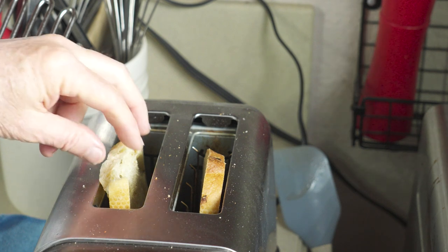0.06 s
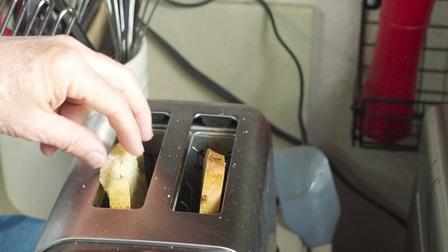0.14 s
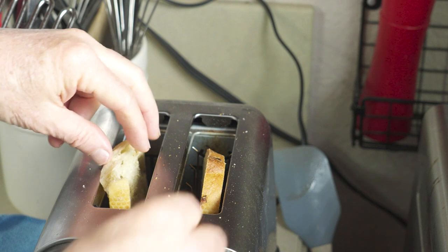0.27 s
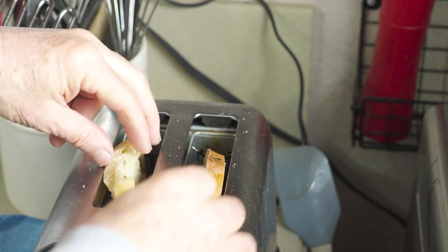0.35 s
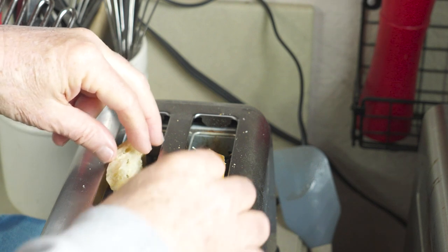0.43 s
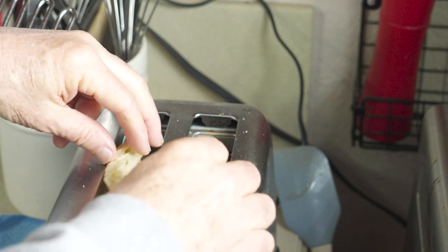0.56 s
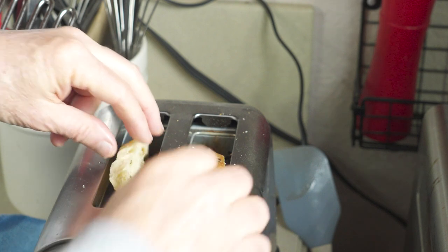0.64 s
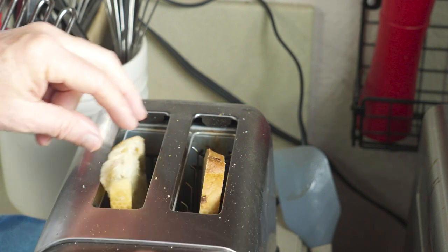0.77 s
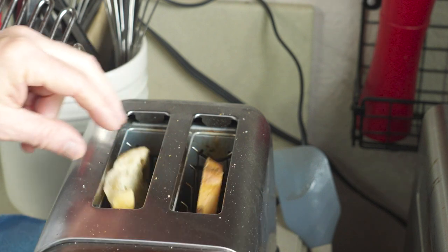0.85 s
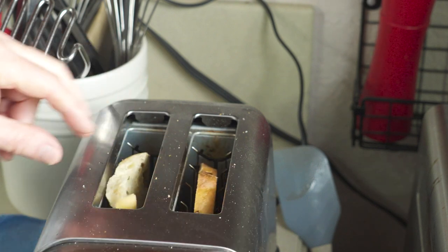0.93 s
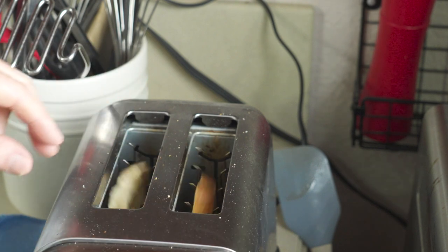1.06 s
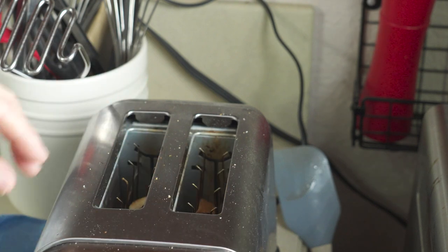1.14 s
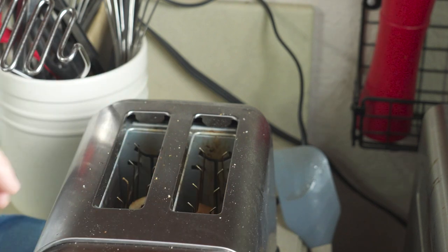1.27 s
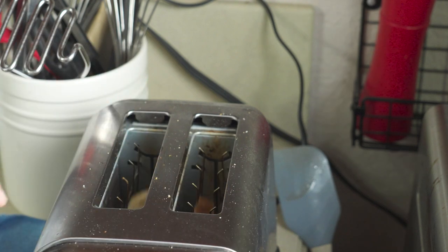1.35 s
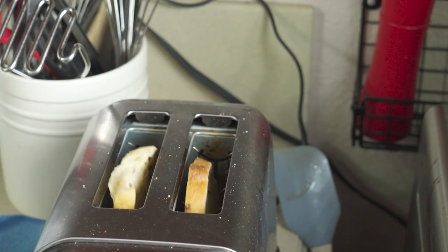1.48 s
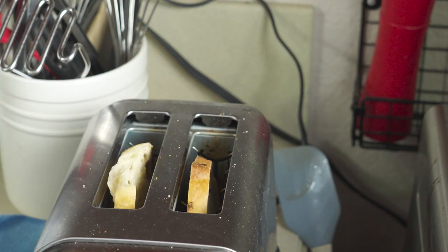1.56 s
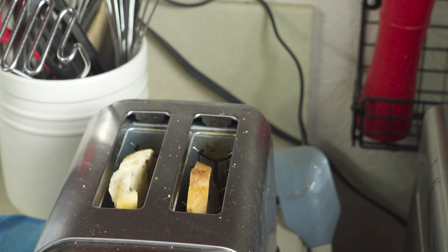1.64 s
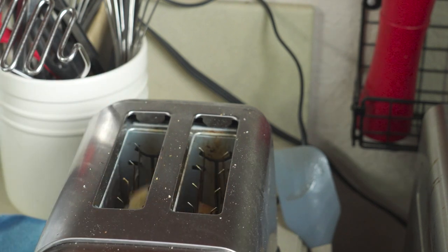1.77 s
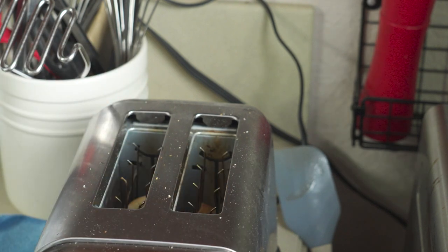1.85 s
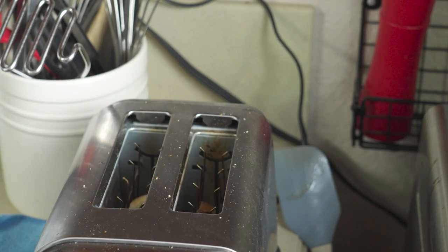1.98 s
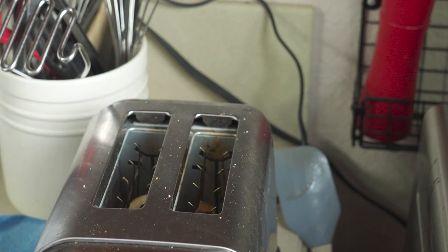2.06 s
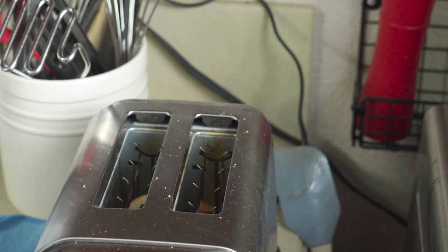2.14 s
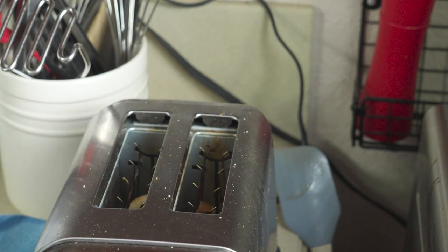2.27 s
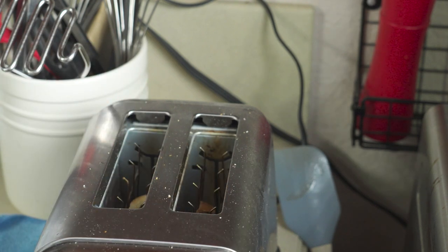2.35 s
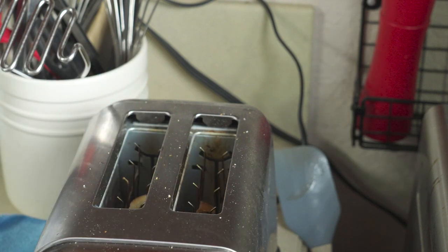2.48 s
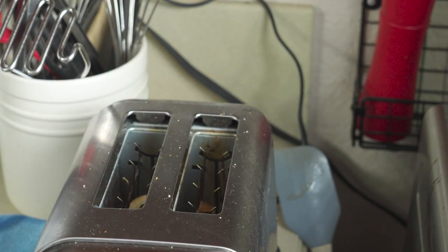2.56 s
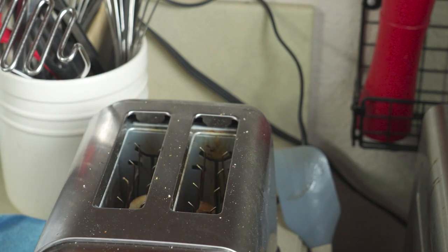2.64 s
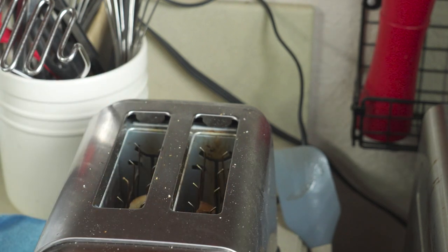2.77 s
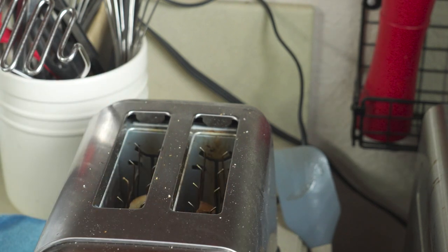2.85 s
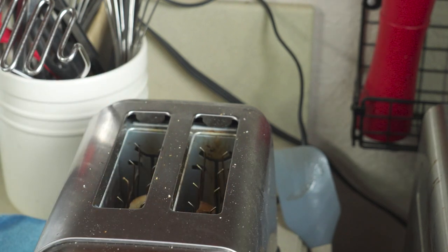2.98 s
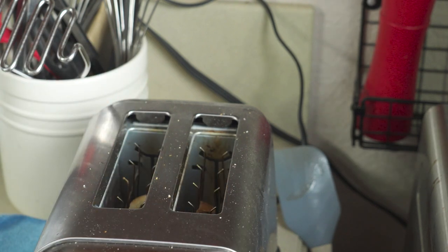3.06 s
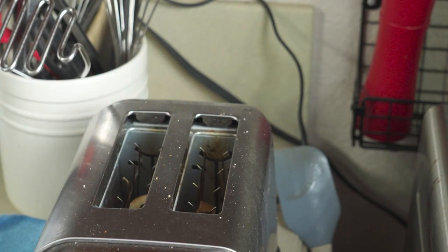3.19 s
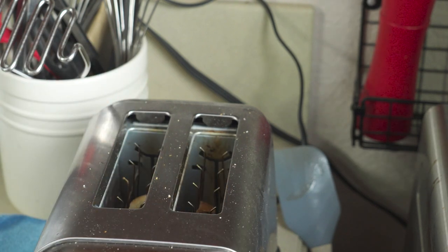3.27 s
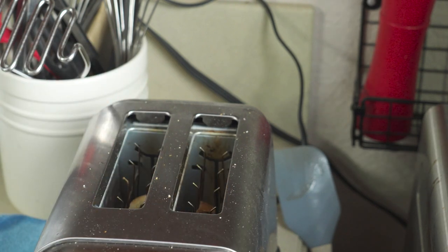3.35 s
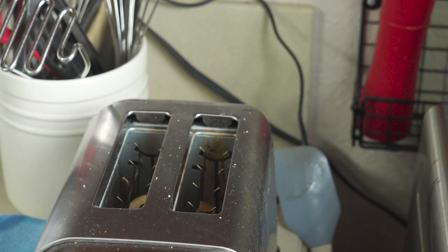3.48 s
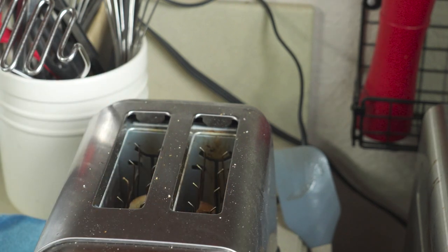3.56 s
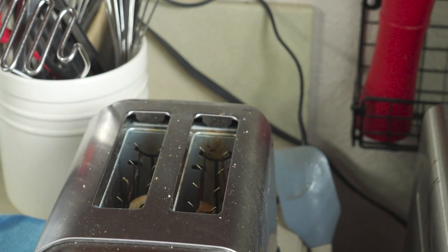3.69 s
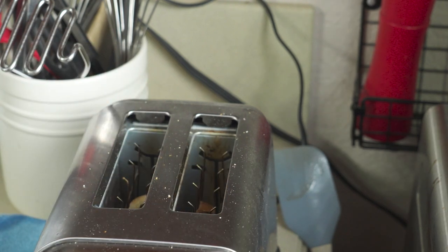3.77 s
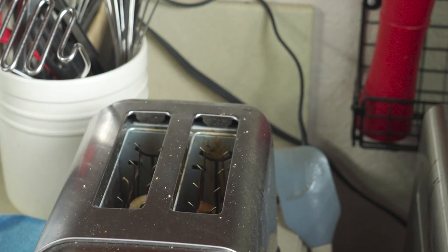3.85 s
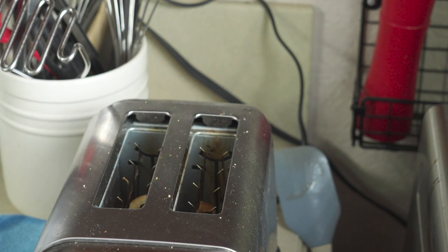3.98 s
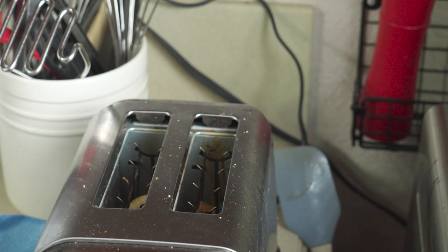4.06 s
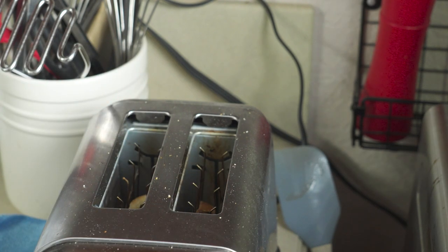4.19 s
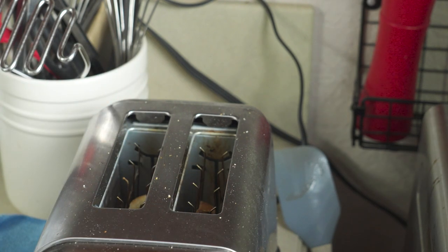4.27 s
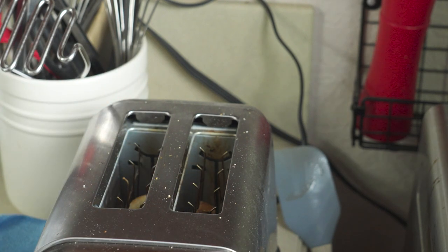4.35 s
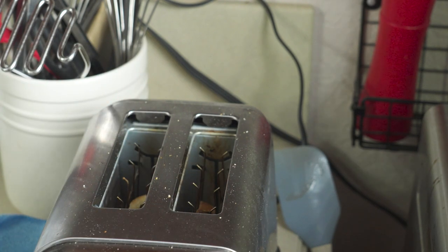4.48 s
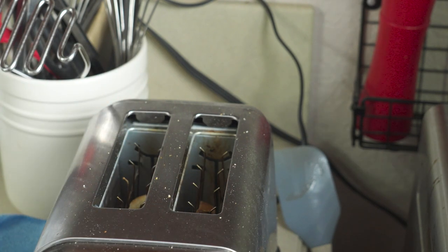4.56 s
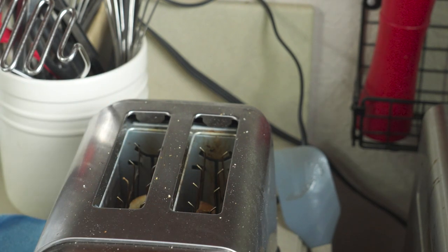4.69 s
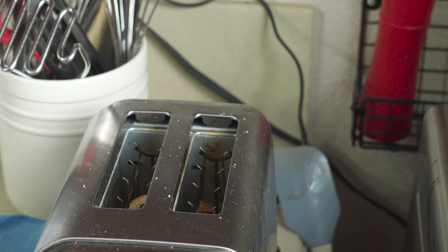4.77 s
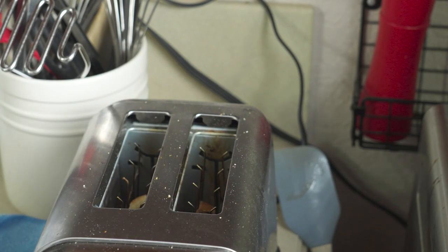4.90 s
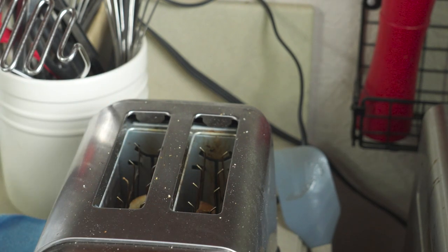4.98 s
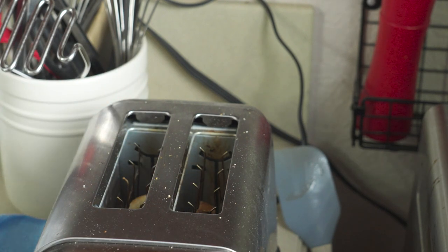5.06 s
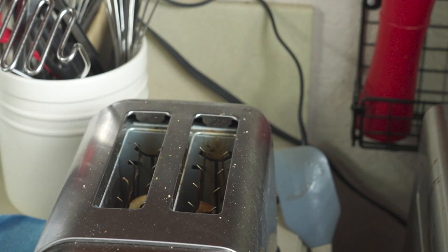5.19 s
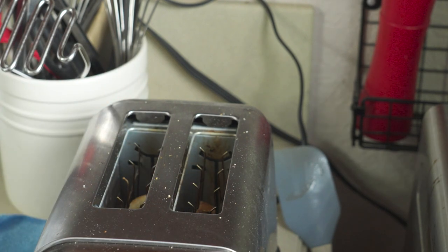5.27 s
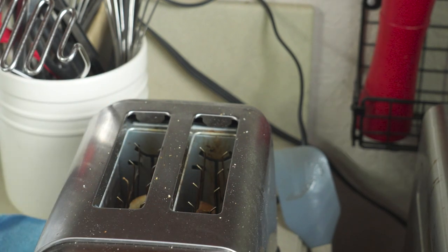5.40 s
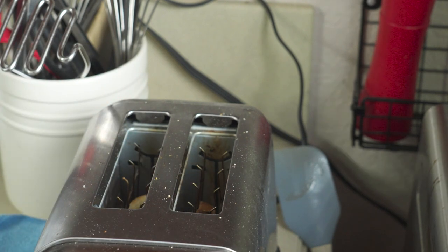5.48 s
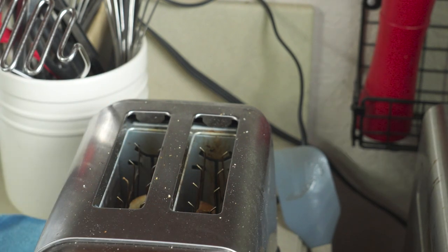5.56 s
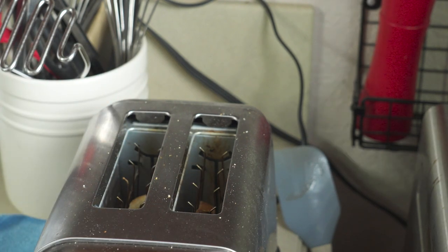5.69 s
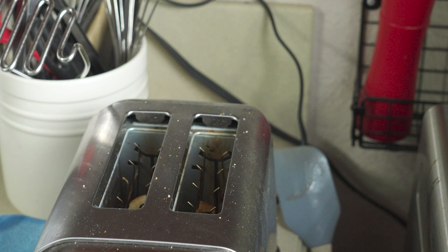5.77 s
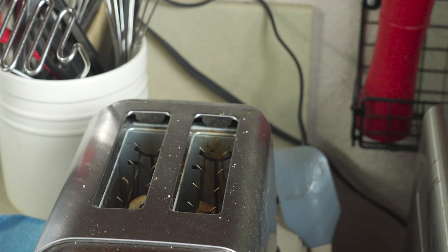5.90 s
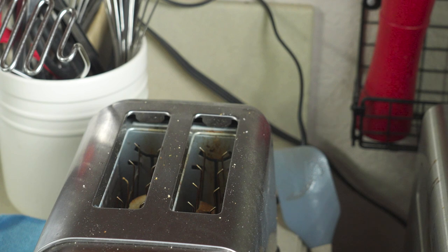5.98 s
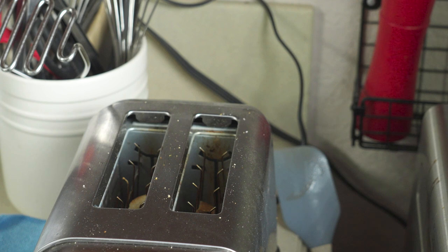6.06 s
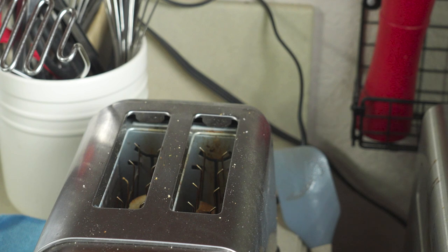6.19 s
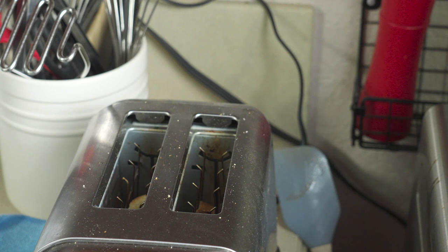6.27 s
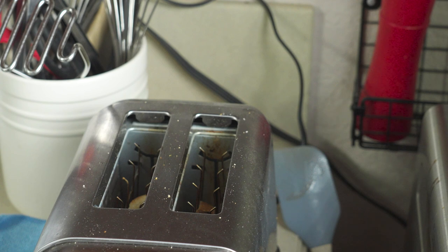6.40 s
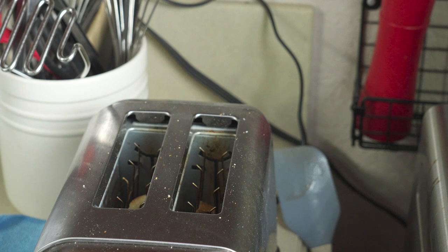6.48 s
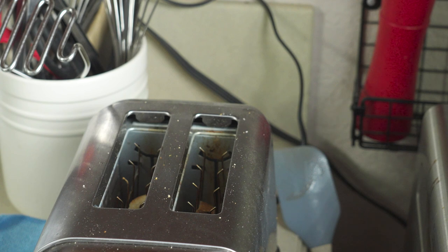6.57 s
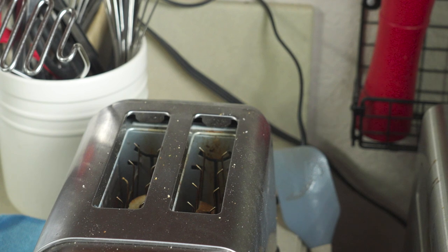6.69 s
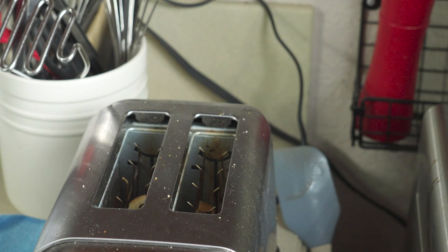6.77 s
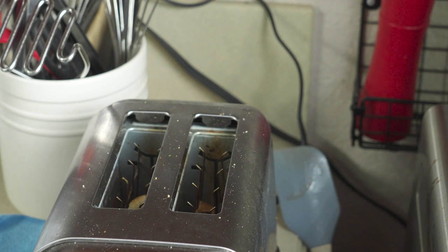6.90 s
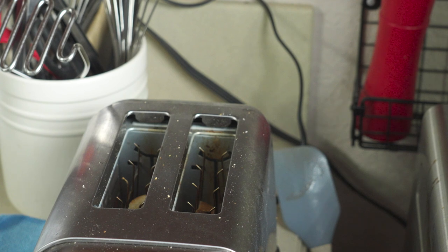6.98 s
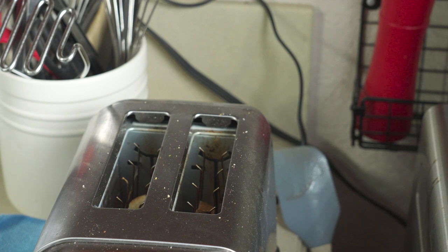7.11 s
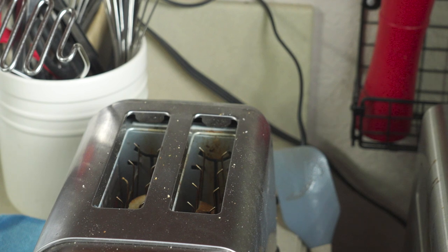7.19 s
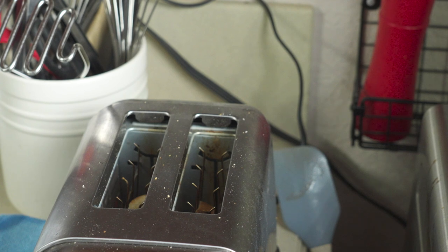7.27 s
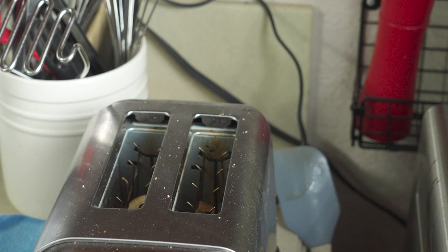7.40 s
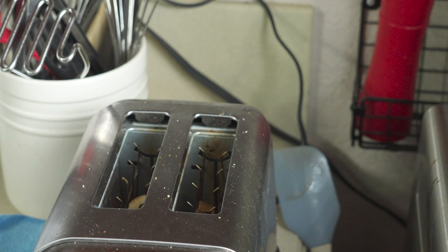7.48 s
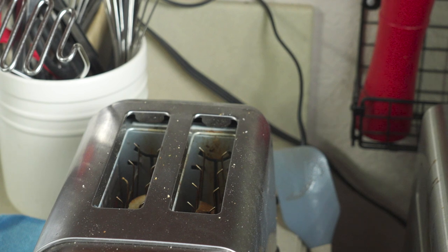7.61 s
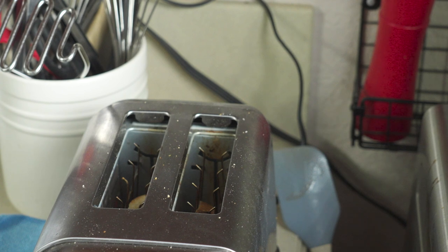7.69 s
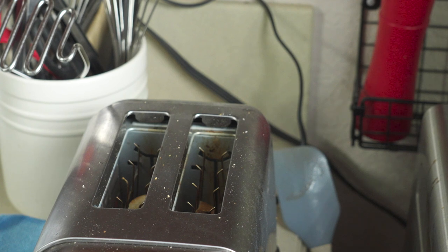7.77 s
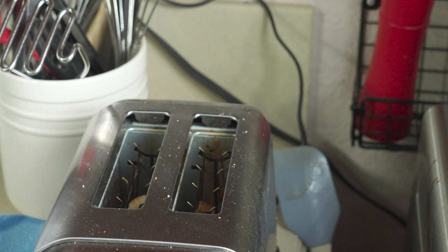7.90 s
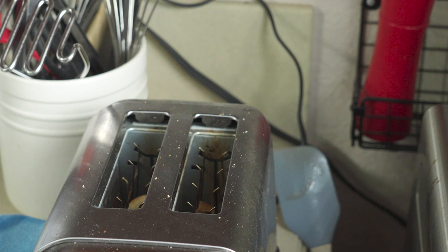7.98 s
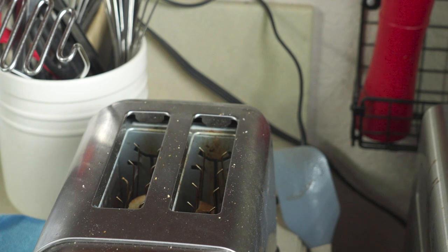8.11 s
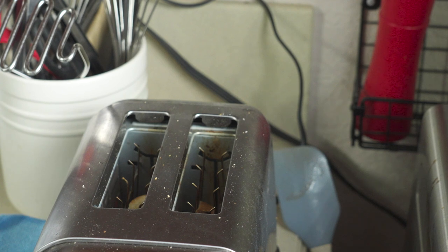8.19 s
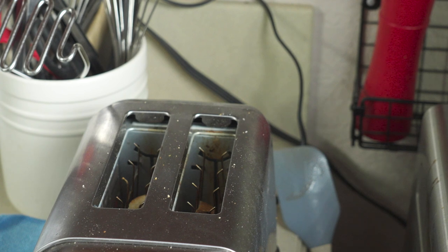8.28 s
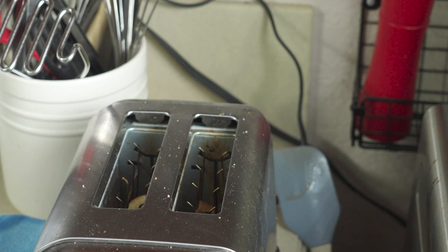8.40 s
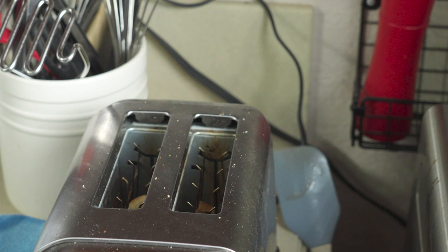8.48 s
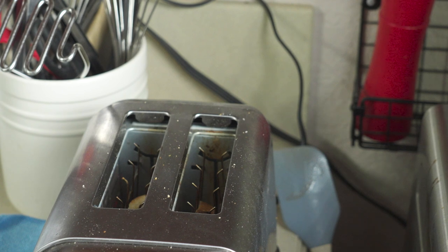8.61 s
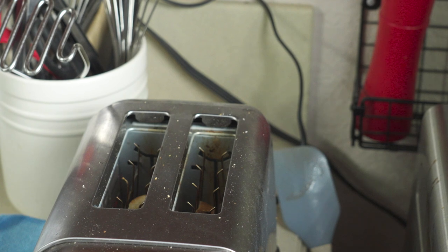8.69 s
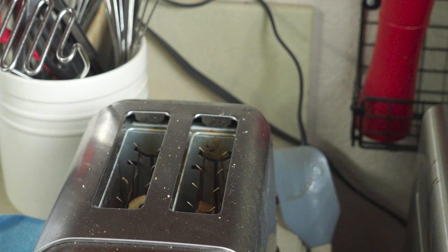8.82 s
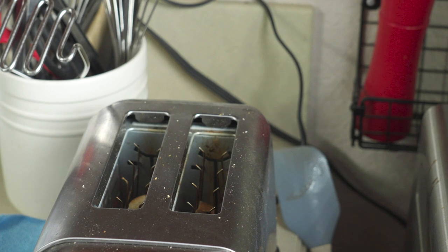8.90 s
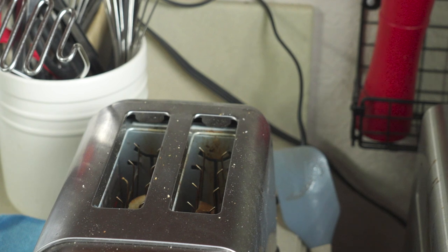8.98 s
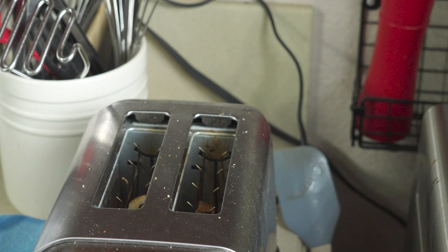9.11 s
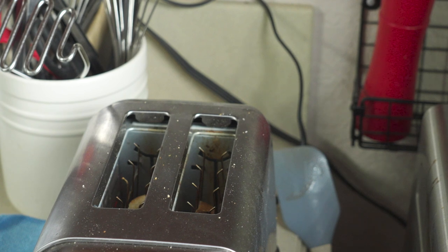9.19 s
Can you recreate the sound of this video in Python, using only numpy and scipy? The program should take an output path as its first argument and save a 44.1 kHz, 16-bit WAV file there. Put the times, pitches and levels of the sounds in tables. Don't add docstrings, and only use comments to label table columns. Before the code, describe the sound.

Close microphone by a metal toaster: faint bumps and scraping, a loud sharp clack with rattling, then a second, louder clunk as the carriage catches. A very faint low hum lingers under soft hiss. Someone moves about, with dull steps, a cluster of crockery knocks and small ticks midway, soft handling later, then a latch click and a bouncing, hollow door slam. Short room echo.

```python
import sys
import numpy as np
from scipy import signal
from scipy.fft import rfft, irfft
from scipy.io import wavfile
from scipy.ndimage import uniform_filter1d

SR = 44100
rng = np.random.default_rng(int(sys.argv[2]) if len(sys.argv) > 2 else 0)


def voltage_ratio(level):
    return 10 ** (np.asarray(level, float) / 20)


def dump_mix(stems):
    frames = np.atleast_2d(stems).T
    limited = np.clip(frames, -1, 1)
    pcm = np.round(limited * 32767).astype(np.int16)
    wavfile.write(sys.argv[1], SR, pcm)


N = 407925

# time in seconds, level in dB.
AIR_LEVEL = [(0.0, -59.5), (9.25, -61.5)]
# pitch in Hz, strength in dB per Hz.
HISS_COLOUR = [(24, -62), (40, -18), (80, -10), (287, -8), (509, -1.5), (562, -6), (778, -2.5),
               (1250, -5.5), (1380, -2.5), (2390, -5), (5440, -4), (7710, -8.5), (10700, -13.5),
               (15500, -12.5)]
# time in seconds, level in dB.
HUM_LEVEL = [
    (2.15, -69),
    (2.232, -79),
    (2.826, -78.5),
    (3.038, -83.5),
    (3.22, -79),
    (3.592, -85),
    (4.2, -85.5),
    (5.25, -89.5),
    (6.55, -85),
]
# pitch in Hz, level in dB, ring length in seconds before it is
# scaled down and capped at 45 ms.
SHELL_RINGS = [(221, 2.5, 0.51), (404, -8, 0.54), (573, -4, 0.84), (825, -18, 0.22), (1404, 1.5, 0.83),
               (1776, 8, 0.33), (1910, 4, 0.074), (2830, 12.5, 0.06), (3500, -24, 0.24), (3460, -19, 0.9),
               (3800, -10, 0.37), (4100, -22, 0.13), (5685, -4, 0.35), (6245, -18, 0.28), (7230, -34, 0.28),
               (6760, -21, 0.19)]
# pitch in Hz, strength in dB per Hz.
SHELL_COLOUR = [(35, -19), (60, -5), (187, -14), (226, -10), (272, -23), (403, -4.5), (464, 1), (585, -2),
                (1020, -8), (1290, -7.5), (2150, -10), (3050, -12), (7370, -22.5), (15500, -32.5)]
# start in seconds, peak level in dB,
# rattle time to fall 60 dB in seconds, favoured pitch in Hz.
SLIDES = [(0.84, -44.5, 0.22, 300), (0.899, -39, 0.17, 509), (1.079, -45.5, 0.13, 606),
          (1.149, -15.5, 0.17, 2420), (1.156, -14.5, 0.18, 547), (1.415, -33.5, 0.16, 859),
          (1.439, -34, 0.81, 506), (1.499, -31.5, 0.12, 1730), (1.571, -38.5, 0.12, 3840),
          (1.69, -41, 0.2, 3500), (1.775, -26, 0.11, 482), (1.783, -12, 0.27, 573),
          (2.007, -30, 0.052, 476), (2.04, -39, 0.18, 490), (2.079, -39, 0.18, 501)]
# start in seconds, peak level in dB, rattle time to fall 60 dB in seconds,
# treble tilt in dB per octave, favoured pitch in Hz.
CLICKS = [
    (0.88, -41.5, 0.074, 3, 886),
    (1.479, -25.5, 0.1, 2.5, 4050),
    (2.006, -36, 0.046, 0, 1400),
    (2.205, -41.5, 0.03, 3, 5430),
]
# start in seconds, peak level in dB, gap to the first bounce in seconds,
# loss in dB per bounce, favoured pitch in Hz.
SLAMS = [
    (1.175, -7, 0.004, 2.5, 1465),
    (1.801, -4.5, 0.0065, 4, 2430),
]
# start in seconds, peak level in dB, floor pitch in Hz,
# sole snap level in dB.
FOOTFALLS = [(0.869, -43, 99.6, 8.5), (1.077, -51, 99.6, -4), (1.178, -26.5, 74.5, 7), (1.599, -47, 85, 3),
             (1.8, -32, 104, 10), (1.83, -31, 73, 18), (2.6, -54.5, 60, -12), (2.751, -53.5, 65, -13.5),
             (3.178, -51.5, 73, -13), (3.718, -42.5, 78, -13), (3.754, -49.5, 87, -3.5),
             (5.42, -53, 73, -12), (5.475, -51, 79, -20), (5.55, -43, 80.6, -13.5), (5.622, -53, 77, -12),
             (5.848, -54, 57, -20), (6.57, -39, 70.4, -7), (6.269, -57, 119, 7), (6.678, -54, 75.4, -12),
             (6.767, -51.5, 83.5, -3), (7.228, -42, 100, 0.5), (7.295, -43, 67.6, 3),
             (7.501, -44.5, 89, 0.5), (7.77, -59, 69.6, -15), (7.871, -41, 64.6, 3), (8.473, -34, 86.1, -1),
             (8.599, -30, 104, 3.5), (8.987, -45, 99, -7), (9.068, -46, 78.1, 2), (9.201, -38, 94.2, 4)]
# start in seconds, peak level in dB, upper ring in Hz.
KNOCKS = [
    (2.01, -31.5, 1180),
    (4.162, -38, 1130),
    (4.264, -28.5, 1090),
    (4.279, -36.5, 775),
    (7.485, -44.5, 730),
    (8.999, -48, 1110),
    (9.099, -47, 800),
    (9.159, -41.5, 1110),
    (9.2, -41.5, 1040),
    (9.234, -42, 774),
]
# start in seconds, peak level in dB, low ring in Hz,
# high ring in Hz, rattle time to fall 60 dB in seconds.
DRAGS = [(2.8, -50, 1500, 1530, 0.2), (2.92, -50, 1330, 1400, 0.29), (2.998, -47.5, 1250, 1330, 0.19),
         (4.171, -40, 487, 2460, 0.19), (4.445, -39, 1190, 1500, 0.63), (4.61, -37.5, 1340, 1590, 0.3),
         (4.679, -38.5, 1150, 1600, 0.058), (4.799, -42, 1250, 1450, 0.24), (7.51, -47, 393, 1600, 0.67),
         (7.599, -47, 513, 1670, 0.12), (9.139, -53, 1130, 2000, 0.33)]
# time of a loudest moment in seconds, level in dB.
RUSTLE = [
    (2.818, -61),
    (3.024, -58.5),
    (3.124, -66),
]
# start in seconds, peak level in dB,
# centre pitch in Hz, rattle time to fall 60 dB in seconds.
SCUFFS = [(3.415, -47, 1460, 0.14), (4.15, -36.5, 2150, 0.12), (4.242, -39.5, 1070, 0.087),
          (4.51, -36, 1500, 0.12), (4.55, -51, 1340, 0.15), (5.405, -42, 800, 0.072),
          (5.849, -46.5, 1400, 0.33), (6.257, -43, 1110, 0.19), (7.241, -41, 1350, 0.3),
          (7.52, -45, 2580, 0.52), (9.077, -48, 666, 0.35), (9.218, -50, 790, 0.18)]
# start in seconds, peak level in dB, low ring in Hz, high ring in Hz,
# rattle time to fall 60 dB in seconds.
TICKS = [
    (3.555, -44, 1700, 3000, 0.018),
    (3.6898, -50, 1400, 5310, 0.024),
    (4.4876, -40, 1530, 2450, 0.066),
    (4.5111, -39.5, 2000, 3130, 0.11),
    (4.6082, -44, 1500, 3610, 0.035),
    (4.6658, -44, 2160, 3000, 0.034),
    (4.776, -48, 2080, 5600, 0.036),
    (7.2417, -44.5, 1530, 5500, 0.033),
]
# start in seconds, peak level in dB, ring in Hz,
# rattle time to fall 60 dB in seconds.
CHIRPS = [
    (4.6656, -31.5, 1970, 0.017),
    (4.805, -49, 1490, 0.1),
    (7.2302, -37.5, 1563, 0.15),
    (7.869, -41, 1350, 0.12),
    (9.14, -50, 1110, 0.17),
    (9.185, -48, 1080, 0.15),
    (4.165, -47, 490, 0.2),
]
# start in seconds, peak level in dB, low ring in Hz, high ring in Hz,
# rattle time to fall 60 dB in seconds.
TAPS = [
    (4.262, -28, 540, 2440, 0.035),
    (4.288, -44, 520, 1500, 0.06),
    (4.509, -41, 1170, 1180, 0.096),
    (7.229, -49, 495, 1580, 0.033),
    (7.298, -46, 430, 1600, 0.039),
    (7.331, -58, 405, 1610, 0.073),
    (7.503, -51, 384, 1710, 0.093),
]
# start in seconds, peak level in dB, gap to the first bounce
# in seconds, loss in dB per bounce, favoured pitch in Hz.
LATCH = [
    (7.869, -35.5, 0.014, 2, 520),
    (7.963, -29.5, 0.0099, 2.2, 880),
]
JUDDER = [
    (8.362, -40, 0.026, 1, 404),
]
DOOR_HITS = [
    (8.462, -16, 0.0075, -1.1, 11000),
    (8.493, -19, 0.01, 4, 1280),
    (8.555, -31, 0.016, 9, 900),
    (8.599, -23.5, 0.008, 1, 9200),
    (8.68, -28.5, 0.012, 0.85, 9200),
    (8.767, -41, 0.035, 3.5, 800),
]
# pitch in Hz, level in dB, ring length in seconds before it is scaled down
# and capped at 45 ms.
PANEL_RINGS = [(316, 6, 0.077), (476, -16, 5.0), (616, -31, 5.0), (940, 9, 0.23), (1220, -32, 0.7),
               (1340, 6.5, 0.19), (2010, 0, 0.53), (2070, -39, 2.2), (2450, -34, 0.4)]
# pitch in Hz, strength in dB per Hz.
PANEL_COLOUR = [(35, -58), (60, -52), (135, 7), (175, -1.5), (305, 11.5), (343, 6), (486, 10.5), (688, 4),
                (1150, -1), (1350, -4), (1520, 0.5), (2710, -7), (5450, -11.5), (15500, -33)]
# time of a loudest moment in seconds, level in dB.
WOBBLE_PEAKS = [
    (8.621, -24),
    (8.705, -29.5),
    (8.781, -33),
    (8.835, -48),
]
# pitch in Hz, time to fall 60 dB in seconds.
KITCHEN_ECHO = [(60, 0.75), (250, 0.39), (1000, 0.41), (4000, 0.4), (14000, 0.29)]
# pitch in Hz, width in Hz, boost in dB.
MICROPHONE = [(3433, 805, 4), (5480, 760, 5), (7570, 630, 7.5), (10650, 1550, -2.5), (12200, 400, 6)]

GRID = 8192
TILT_FROM_HZ, LONGEST_RING_S, STRIKE_SPREAD_DB = 300, 0.045, 2
DULLING_DB = 0.29
RING_CYCLES, SCRATCH_FALL_DB = 18, 4.5


def rms_one(x):
    return x / np.sqrt(np.mean(x ** 2) + 1e-20)


def at_hz(points, hz):
    pitches, values = np.array(points)[:, 0], np.array(points)[:, 1]
    return np.interp(np.log(hz), np.log(pitches), values)


def coloured(x, gain_db):
    hz = np.maximum(np.arange(GRID // 2 + 1) * SR / GRID, 10)
    cepstrum = irfft(gain_db(hz) * np.log(10) / 20)
    cepstrum[1:GRID // 2] *= 2
    cepstrum[GRID // 2 + 1:] = 0
    response = irfft(np.exp(rfft(cepstrum)))
    return signal.fftconvolve(x, response)[:len(x)]


def ring(x, hz, t60):
    shrink = voltage_ratio(-60 / (max(t60, 0.002) * SR))
    turn = 2 * np.pi * hz / SR
    return signal.lfilter([0, np.sin(turn)], [1, -2 * shrink * np.cos(turn), shrink * shrink], x + 1e-18)


def rattle(rise, t60, spread_db, first_db):
    t = np.arange(SR // 3) / SR
    uneven_db = spread_db * np.minimum(rng.exponential(1, len(t)), 5)
    clicks = rms_one(voltage_ratio(uneven_db) * rng.standard_normal(len(t)))
    swell = (1 - np.exp(-t / rise)) ** 2
    force = clicks * swell * voltage_ratio(-60 * t / max(t60, 0.005))
    force[0] = voltage_ratio(first_db)
    return force


def add(out, sound, s, peak_db):
    start = round(s * SR)
    loudest = uniform_filter1d(sound ** 2, size=128).max()
    scaled = voltage_ratio(peak_db) * sound / np.sqrt(loudest)
    out[start:start + len(sound)] += scaled[:N - start]


def level(rows):
    s, db = np.transpose(rows)
    return voltage_ratio(np.interp(np.arange(N) / SR, s, db, left=-200, right=-200))


def swells(peaks, rise, fall):
    t = np.arange(N) / SR
    total = 0
    for s, db in peaks:
        below_db = np.where(t < s, rise * (s - t), fall * (t - s))
        total = total + voltage_ratio(db - np.clip(below_db, 0, 200))
    return total


def narrow_noise(hz, width_hz):
    t60 = np.log(1000) / np.pi / width_hz
    once = ring(rng.standard_normal(N), hz, t60)
    return rms_one(ring(once, hz, t60))


def bounced(hits, count, growth, t60, tilt_db, spots_hz):
    contacts = []
    for s, db, gap, loss_db, hz in hits:
        for k in range(count + 1):
            delay = gap * sum(growth ** j for j in range(k))
            spot_hz = spots_hz[(k - 1) % 2] if k else hz
            contacts.append((s + delay, db - loss_db * k, t60, tilt_db - DULLING_DB * k, spot_hz))
    return contacts


def struck(contacts, modes, body, modes_db, damping, rise, first_db):
    out = np.zeros(N)
    for s, peak_db, t60, tilt, spot_hz in contacts:
        def lean(hz):
            slope = tilt * np.log2(np.maximum(hz, TILT_FROM_HZ) / 1000)
            return slope + 6 * np.exp(-(np.log2(hz / spot_hz) / 0.35) ** 2)

        force = coloured(rattle(rise, t60, spread_db=2.5, first_db=first_db), lean)
        broad = coloured(force, lambda hz: at_hz(body, hz))
        changes_db = rng.normal(0, STRIKE_SPREAD_DB, len(modes))
        rings = 0
        for (hz, db, mode_t60), change_db in zip(modes, changes_db):
            rings = rings + voltage_ratio(db + change_db) * ring(force, hz, min(damping * mode_t60, LONGEST_RING_S))
        add(out, rms_one(broad) + voltage_ratio(modes_db) * rms_one(rings), s, peak_db)
    return out


def background():
    hiss = rms_one(coloured(rng.standard_normal(N), lambda hz: at_hz(HISS_COLOUR, hz)))
    hum = level(HUM_LEVEL) * narrow_noise(137.6, width_hz=12)
    rumble = voltage_ratio(-86) * narrow_noise(22, width_hz=22.0)
    return level(AIR_LEVEL) * hiss + voltage_ratio(2.5) * hum + rumble


def toaster():
    rubs = [(s, db, t60, 0.9, hz) for s, db, t60, hz in SLIDES]
    slides = struck(rubs, SHELL_RINGS, SHELL_COLOUR, modes_db=-17, damping=0.25, rise=0.0036, first_db=-44)
    hits = bounced(SLAMS, count=5, growth=1.42, t60=0.06, tilt_db=0.76, spots_hz=(610, 1400)) + CLICKS
    slams = struck(hits, SHELL_RINGS, SHELL_COLOUR, modes_db=-17, damping=0.4, rise=0.0006, first_db=6)
    return voltage_ratio(-11.0) * slams + voltage_ratio(-14.5) * slides


def steps():
    out = np.zeros(N)
    for s, peak_db, hz, snap_db in FOOTFALLS:
        push = rattle(0.002, 0.065, spread_db=5.0, first_db=16.5)
        soft_push = signal.lfilter([0.03], [1, -0.97], push)
        boom = ring(soft_push, hz, t60=0.067)
        snap = coloured(push, lambda f: -9.0 * np.log2(f / 280) ** 2)
        add(out, rms_one(boom) + voltage_ratio(snap_db) * rms_one(snap), s, peak_db - 4.5)
    return out


def handled(contacts, scratch_db, rise, first_db):
    out = np.zeros(N)
    no_bass = signal.butter(4, 380, "high", fs=SR, output="sos")
    for s, peak_db, low_hz, high_hz, t60 in contacts:
        force = rattle(rise, t60, spread_db=2.5, first_db=first_db)
        low_ring = rms_one(ring(force, low_hz, RING_CYCLES / low_hz))
        high_ring = rms_one(ring(force, high_hz, RING_CYCLES / high_hz))
        middle_hz = np.sqrt(low_hz * high_hz)
        scratch = coloured(force, lambda hz: -SCRATCH_FALL_DB * np.log2(hz / middle_hz) ** 2)
        whole = low_ring + high_ring + voltage_ratio(scratch_db) * rms_one(scratch)
        add(out, signal.sosfilt(no_bass, whole), s, peak_db)
    return out


def one_note(rows):
    return [(s, db, hz, hz, t60) for s, db, hz, t60 in rows]


def handling():
    knocks = [(s, db, 520, hz, 0.077) for s, db, hz in KNOCKS]
    drags = 0
    for rows, scratch_db in [(DRAGS, -3), (one_note(SCUFFS), 18), (knocks, -4)]:
        drags = drags + handled(rows, scratch_db, rise=0.0033, first_db=-28)
    taps = 0
    for rows, scratch_db in [(TAPS, -2.5), (TICKS, 7), (one_note(CHIRPS), -9)]:
        taps = taps + handled(rows, scratch_db, rise=0.001, first_db=16)
    cloth = rms_one(coloured(rng.standard_normal(N), lambda hz: -3.5 * np.log2(hz / 6500) ** 2))
    rustle = swells(RUSTLE, rise=133, fall=225) * cloth
    return voltage_ratio(-7.0) * taps + voltage_ratio(-13) * drags + rustle


def door():
    latch = bounced(LATCH, count=3, growth=1.7, t60=0.12, tilt_db=0.5, spots_hz=(1500, 560))
    judder = bounced(JUDDER, count=3, growth=1, t60=0.12, tilt_db=-4, spots_hz=(326, 300))
    shut = bounced(DOOR_HITS, count=3, growth=1.7, t60=0.082, tilt_db=1.5, spots_hz=(1250, 310))
    hits = latch + judder + shut
    return voltage_ratio(-7) * struck(hits, PANEL_RINGS, PANEL_COLOUR, modes_db=-12, damping=0.11, rise=0.0012, first_db=-7)


def wobble():
    tone_hz, width_hz = 497, 8
    wander = np.cumsum(rng.standard_normal(N)) * np.sqrt(2 * np.pi * width_hz / SR)
    phase = 2 * np.pi * tone_hz * np.arange(N) / SR + uniform_filter1d(wander, size=512)
    return np.sqrt(2) * swells(WOBBLE_PEAKS, rise=503, fall=228) * np.sin(phase)


def evened(tail):
    power = np.abs(rfft(tail[:GRID])) ** 2 + 1e-12
    ripple_db = 10 * np.log10(uniform_filter1d(power, size=5) / uniform_filter1d(power, size=61))
    return coloured(tail, lambda hz: -0.7 * ripple_db)


def kitchen(x):
    t = np.arange(SR) / SR
    edges = 40 * 2 ** np.arange(0, 9, 0.5)
    white = rng.standard_normal((2, SR))
    tail = 0
    for k, (low, high) in enumerate(zip(edges, edges[1:])):
        band_filter = signal.butter(2, [low, high], "band", fs=SR, output="sos")
        band = signal.sosfilt(band_filter, white[k % 2])
        tail = tail + band * voltage_ratio(-60 * t / at_hz(KITCHEN_ECHO, np.sqrt(low * high)))
    build_up = np.clip(t / 0.012, 0, 1) ** 2
    tail = evened(tail * build_up)
    return signal.fftconvolve(x, tail / np.sqrt(np.sum(tail ** 2)))[:N]


def scene():
    air = background()
    near, low, small, shut = toaster(), steps(), handling(), door()
    near_echo = kitchen(voltage_ratio(-12) * near + voltage_ratio(-2.0) * low)
    far_echo = kitchen(voltage_ratio(-7) * shut + voltage_ratio(-10.5) * small)
    bass_cut = signal.butter(3, 62, "high", fs=SR, output="sos")
    events = signal.sosfilt(bass_cut, near + shut + small + low + near_echo + far_echo)
    return (events + voltage_ratio(-9.0) * wobble() + air)[None]


def band_limit(x):
    return signal.sosfilt(signal.butter(12, 16150, fs=SR, output="sos"), x)


def record(dry):
    def bumps(hz):
        return sum(db * np.exp(-((hz - f) / width) ** 2) for f, width, db in MICROPHONE)

    top_cut = signal.cheby2(12, 60, 16300, fs=SR, output="sos")
    mix = signal.sosfilt(top_cut, coloured(dry[0], bumps))[None]
    return band_limit(mix)


dry = scene()
out = record(dry)
dump_mix(out)
```